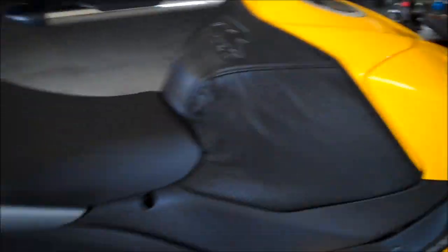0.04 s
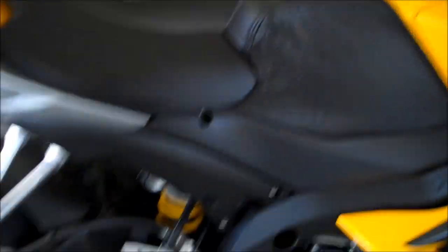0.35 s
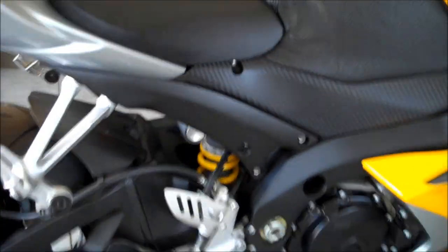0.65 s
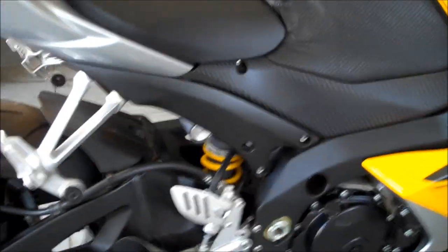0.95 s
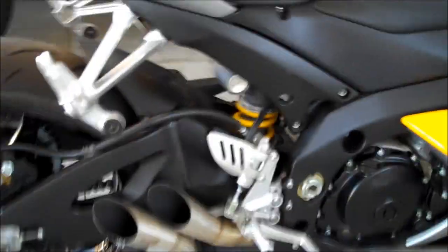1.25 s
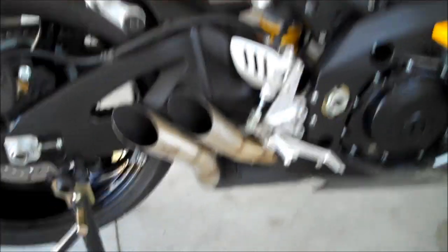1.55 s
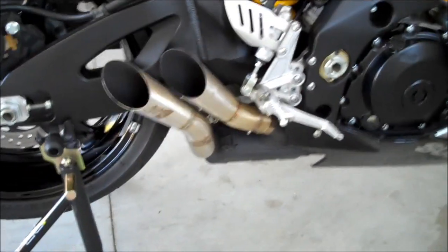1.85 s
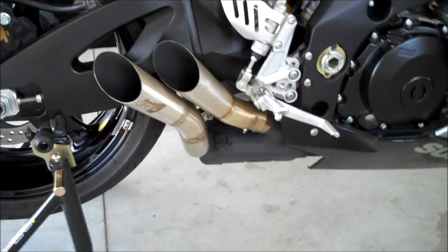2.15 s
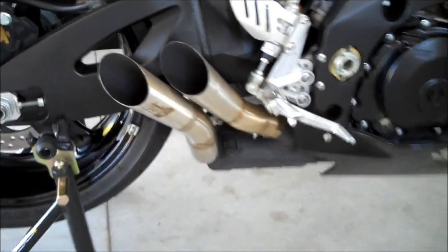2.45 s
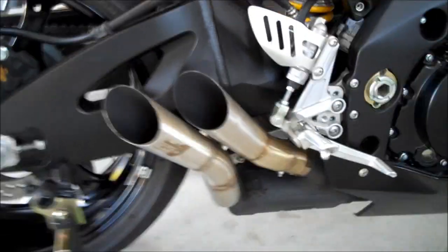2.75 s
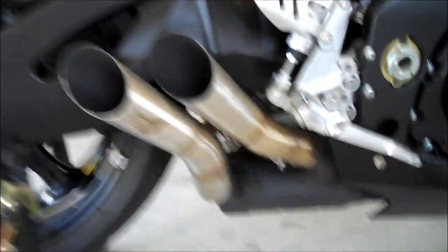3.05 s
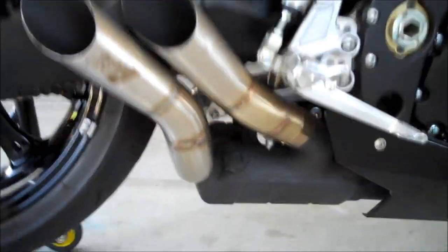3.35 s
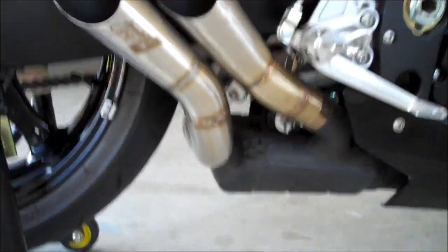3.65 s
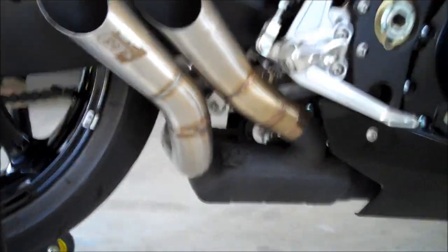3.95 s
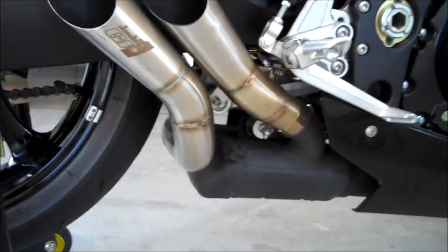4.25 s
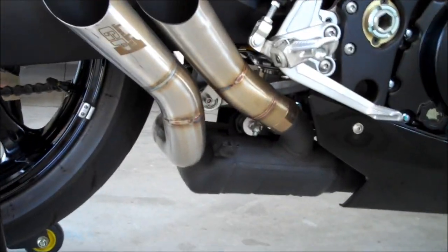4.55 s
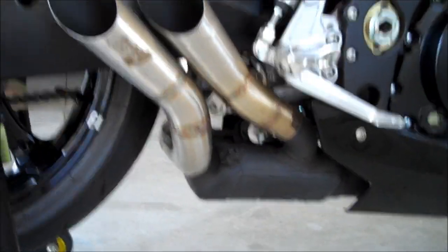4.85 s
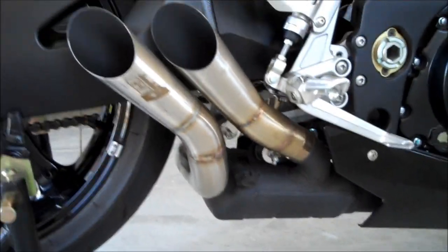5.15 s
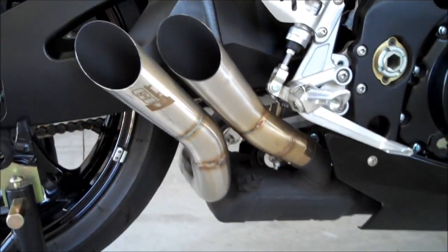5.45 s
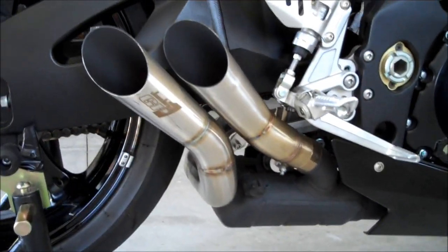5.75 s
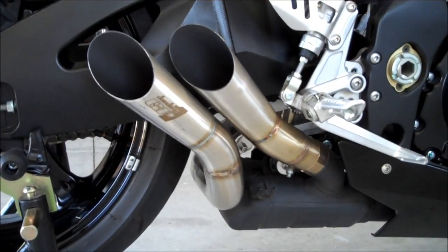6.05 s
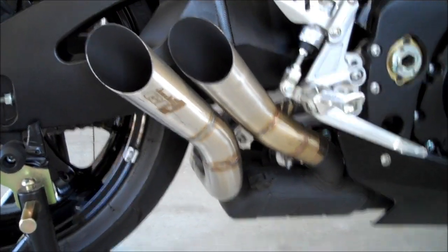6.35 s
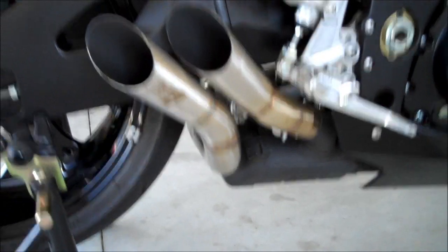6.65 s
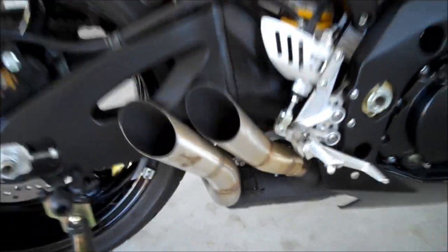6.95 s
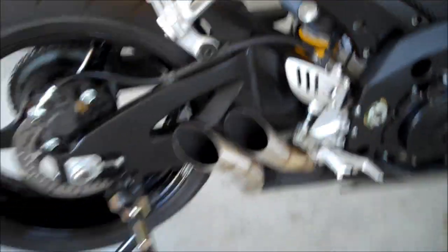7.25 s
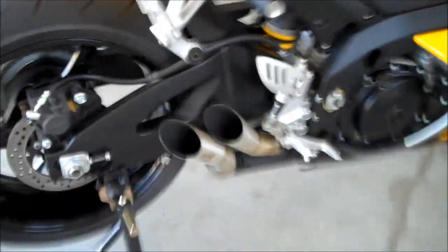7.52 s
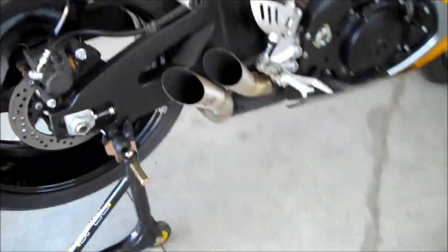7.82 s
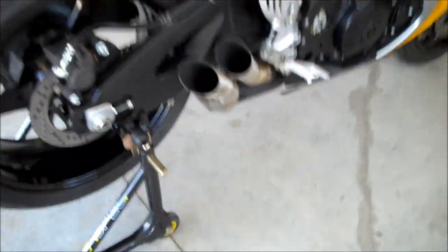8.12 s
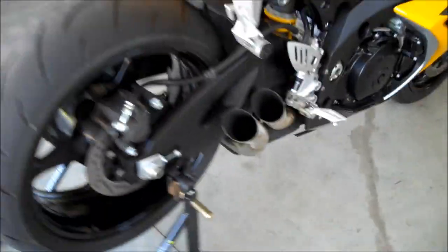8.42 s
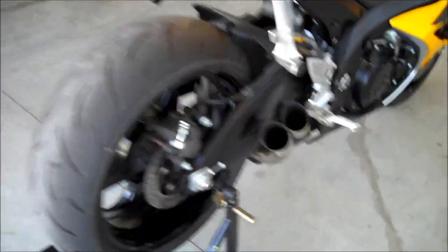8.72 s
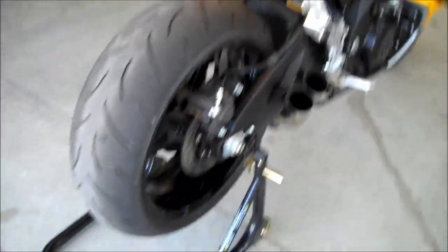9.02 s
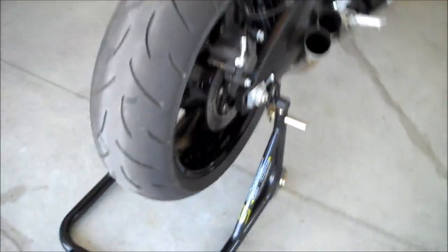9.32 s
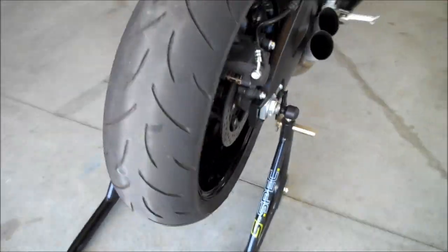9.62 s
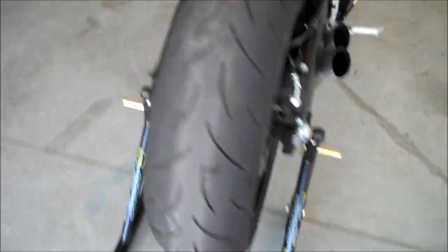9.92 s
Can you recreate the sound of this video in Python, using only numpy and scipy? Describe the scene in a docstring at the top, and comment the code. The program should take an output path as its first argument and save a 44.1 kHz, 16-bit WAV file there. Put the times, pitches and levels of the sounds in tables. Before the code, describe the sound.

Loud motorcycle exhaust pulses from start to finish at a slightly uneven idle, a bassy drone with a raspy, tinny crackle on top. Weak firings make it sag and surge back, and a few pop more sharply. The microphone moves in near the open pipes midway, where the thud deepens, then backs away toward the rear, where the sound turns a little brighter and hollower. The garage adds a short echo.

```python
"""A garage: a four-cylinder sport motorcycle idles at about 1200 rpm through two short open pipes.
Each firing, some forty a second, throws out a sharp crack, a sizzle and a chuff of gas, pings the pipe
walls and sets off a deep boom near 120 Hz with a honk an octave above. The idle hunts and stumbles:
weak firings let the boom sag and drag the crank, the sound surges back, and some firings spit.
The microphone passes close by the pipes and ends up behind the rear wheel."""
import sys
import numpy as np
from scipy import signal
from scipy.fft import rfft, irfft, next_fast_len
from scipy.io import wavfile

SR = 44100
rng = np.random.default_rng(int(sys.argv[2]) if len(sys.argv) > 2 else 0)


def to_wav(s):
    """Save 16-bit WAV."""
    ch = np.atleast_2d(s).T  # columns
    pcm = np.round(np.clip(ch, -1, 1) * 32767)  # PCM
    wavfile.write(sys.argv[1], SR, pcm.astype(np.int16))


N = 440118
TIME = np.arange(N) / SR
PADDED = next_fast_len(N, True)
HZ = np.fft.rfftfreq(PADDED, 1 / SR)

# the hunting idle: (time [s], firing rate [Hz])
FIRING_RATE = [(0.0, 40.04), (0.591, 41.75), (0.927, 40.42), (1.389, 42.62), (1.666, 38.37), (1.997, 41.19),
               (2.439, 38.53), (3.482, 41.94), (3.612, 39.43), (3.8, 43.43), (3.947, 39.46), (5.5, 40.2),
               (5.627, 43.78), (5.807, 38.6), (6.152, 40.32), (6.802, 39.56), (6.945, 41.04), (7.9, 40.12),
               (8.055, 41.84), (8.419, 39.53), (8.549, 41.35), (9.114, 38.72), (9.242, 40.6), (9.98, 39.86)]
# accents of the four cylinders, in firing order: (boom [dB], crack [dB])
CYLINDER_ACCENTS = [(5, 2), (4.1, 2.5), (5.5, 4.2), (4, 3.06)]
# runs of weak firings: (time [s], length [firings], boom sag [dB])
STUMBLES = [(1.095, 1.5, 7), (1.477, 0.85, 10), (1.68, 4, 4.5), (1.88, 1, 9), (2.43, 1.4, 7.5),
            (2.51, 2, 5), (2.79, 0.86, 8), (3.357, 1.5, 13), (5.567, 2.3, 10.5), (6.06, 1, 15.5),
            (7.057, 1.1, 12), (7.549, 2.3, 7.5), (7.846, 2.4, 7.5), (8.045, 0.83, 18.5), (8.093, 2, 5.5),
            (8.436, 2.8, 11), (8.98, 3, 5), (9.08, 5.4, 7.5), (9.557, 2, 14.5)]
# firings that spit: (time [s], crack accent [dB])
SPITS = [(1.239, 7.5), (1.503, 0), (1.577, 5.5), (1.707, 5.5), (1.781, 4), (2.304, 7.5), (2.381, 9),
         (2.561, 8), (2.636, 5.5), (2.839, 5), (2.939, 5.5), (3.406, 1), (6.785, 7.5), (6.886, 6.5),
         (7.351, 7), (7.474, 5), (7.55, 8), (7.603, 8.5), (7.677, 6.5), (7.971, 8.5), (8.068, 3),
         (8.192, 6), (8.564, 7.5), (9.033, 2.5), (9.163, 3)]
# the microphone move: (time [s], distance [0 near, at the pipe mouths .. 1 far])
MIC_DISTANCE = [(0, 0.7), (1, 0.61), (1.6, 0.43), (2.5, 0.31), (3.5, 0.023), (6.3, 0.061), (7.5, 0.6),
                (8.5, 0.78), (10, 0.59)]
# fader rides along that move: (time [s], boom [dB], honk [dB], chuff [dB], crack [dB])
FADERS = [(0, -11, -23, -29.5, -36), (.55, -10, -29.5, -31.5, -34), (.85, -10, -30.5, -28.5, -33.5),
          (1.2, -11, -27.5, -32.5, -34), (1.42, -10, -23.5, -27.5, -31), (2.3, -10, -26, -33, -33),
          (3.3, -11, -26, -33, -35), (4.3, -11.5, -24.5, -34.5, -36.5), (5.4, -11.5, -25.5, -36, -36),
          (6.3, -10.5, -24, -33.5, -35.5), (6.75, -11.5, -25, -34.5, -34.5),
          (7.3, -10.5, -27.5, -33.5, -33.5), (8.1, -11.5, -27, -31.5, -35), (8.7, -11, -22.5, -28.5, -34),
          (9.2, -10, -19.5, -29, -32), (9.4, -10.5, -22, -30, -36), (10, -12, -25, -29, -32.5)]
# broad colour of the escaping gas: (frequency [Hz], level [dB])
GAS_COLOUR = [(150, -31), (300, -2.5), (400, -8), (560, -9.5), (860, -12), (1220, -14), (1700, -7.5),
              (2400, -10), (4000, -8), (5200, -7), (7600, -8.5), (10000, -24.5), (12000, -29.5),
              (14500, -33.5)]
# how centred the gas sounds: (frequency [Hz], left-right correlation [0..1])
GAS_CORRELATION = [(300, 0.9), (620, 0.97), (1360, 0.83), (3000, 0.75), (6500, 0.61), (14000, 0.13)]
# pipe resonances: (frequency [Hz], width [Hz], near boost [dB], far boost [dB])
PIPE_MODES = [(477, 50, 8, 4.5), (665, 157, 9.5, 2.5), (738, 32, -0.5, 12.5), (1017, 27, 0, 9.5),
              (1473, 23, 10, 9.5), (2036, 560, 10, 4.5), (2607, 165, 8, 4.5), (2984, 550, 10, 0.5),
              (3600, 170, 9.5, 2), (4800, 110, -0.5, 0.5), (5590, 780, -0.5, -2.5), (6250, 290, 4.5, 3.5)]
# low-end response of pipes and garage: (frequency [Hz], near level [dB], far level [dB])
BOOM_SPECTRUM = [(20, -32, -21), (39.7, -31, -23), (55.5, -11, -24), (79, -16.5, -21.5),
                 (99.8, -16.5, -11.5), (117.2, -0.5, -2.5), (122, 0, 3.5), (146.4, -11, -3.5),
                 (164, -23.5, -19.5), (206.6, -19, -16.5), (249, -59.5, -23), (397, -73.5, -75.5)]
# the octave above the boom and its overtones: (frequency [Hz], level [dB])
HONK_SPECTRUM = [(120, -38.5), (215, -4.5), (244, 4.5), (262, 0.5), (290, -30), (330, -38), (370, -24),
                 (430, -39.5), (490, -32.5), (620, -34)]
# hollow pipe pop, then metallic wall pings: (frequency [Hz], near level [dB], far level [dB], decay [s])
PING_MODES = [(679, -2, -17, 0.0061), (2084, -5, -26.5, 0.0071), (2941, -5, -18.5, 0.0061),
              (3302, -7.5, -19, 0.004), (4600, -35, -2.5, 0.0032), (5594, -7, -11, 0.0056),
              (6457, -10, -6.5, 0.0056), (6960, -52, -28, 0.0027)]
# brief ducks of the whole mix: (time [s], depth [dB], hold until [s after], recovery [s])
DUCKS = [(2.694, 4.5, 0.02, 0.11), (2.969, 7, 0.035, 0.12), (3.657, 12, 0.073, 0.21),
         (4.684, 6, 0.024, 0.094), (5.764, 10.5, 0.082, 0.19), (7.989, 7, 0.062, 0.099),
         (9.465, 8, 0.036, 0.29)]
# tone of the microphone pair: (frequency [Hz], left minus right [dB])
MIC_BALANCE = [(120, -1), (320, -.5), (750, -1.3), (2000, -1), (4000, -1), (6000, -1.6), (7400, 3),
               (9250, 9), (14000, 11.5)]
# bass corners of the pair: (left [Hz], right [Hz])
MIC_CORNERS = [75, 40]

DRAG_S, DRAG_PEAK_S = .0015, .07  # crank lag from one lost firing, and when it peaks
SURGE_DB, SURGE_PEAK_S = [1.5, 2.1, 3, 3], .046  # lift of the four faders per lost firing, and its delay
BOOM_SCATTER_DB, CRACK_SCATTER_DB, JITTER_S = .46, 1.82, .00039  # no two firings are quite alike
WEAK_CRACK_DB = 2.5  # a lost firing cracks this much less
BEFORE_SPIT_DB = -3.5  # the firing before a spit burns poorly and leaves fuel in the pipe
OUTFLOW_DELAY_S = .001  # the bulk of the gas leaves just after the crack


def gain_of(db):
    """Decibels to amplitude."""
    return 10 ** (np.asarray(db) / 20)


def unit_rms(x):
    """Scales to rms 1."""
    return x / np.sqrt(np.mean(x ** 2) + 1e-20)


def spectrum_at(points, hz):
    """Reads a spectrum on a logarithmic frequency axis."""
    f, value = np.transpose(points)
    return np.interp(np.log(hz + 1), np.log(f + 1), value)


def automation(rows):
    """Each column of a timed table as a curve at every sample."""
    times, *columns = np.transpose(rows)
    return [np.interp(TIME, times, column) for column in columns]


def mic_blend(near, far):
    """Crossfades from near to far as the microphone moves."""
    distance = automation(MIC_DISTANCE)[0]
    return (1 - distance) * near + distance * far


def clicks(times, sizes):
    """A train of single-sample impulses."""
    at = np.clip(np.round(times * SR).astype(int), 0, N - 1)
    return np.bincount(at, sizes, N)


def aftermath(times, lost, peak_s):
    """At every firing, the rising and fading effect of the firings lost before it."""
    age = np.maximum(times[:, None] - times, 0) / peak_s
    return (age * np.exp(1 - age)) @ lost


def firings():
    """The engine's rhythm: time and accent of each push and crack, and the surge after stumbles."""
    count = .17 + np.cumsum(automation(FIRING_RATE)[0]) / SR
    times = TIME[1:][np.diff(np.floor(count)) > 0]
    number, sag_db = np.arange(len(times)), np.zeros(len(times))
    for start, length, drop_db in STUMBLES:
        since = number - np.argmin(abs(times - start))
        sag_db += drop_db * (since >= 0) * np.clip(length - since, 0, 1)
    lost = 1 - gain_of(-sag_db)
    times = times + DRAG_S * aftermath(times, lost, DRAG_PEAK_S)
    accents = np.array(CYLINDER_ACCENTS)[number % len(CYLINDER_ACCENTS)]
    push, snap, jitter = rng.standard_normal((len(times), 3)).T
    push_db = accents[:, 0] + BOOM_SCATTER_DB * push - sag_db
    crack_db = accents[:, 1] + CRACK_SCATTER_DB * snap - WEAK_CRACK_DB * lost
    crack_times = times.copy()
    for spit_time, spit_db in SPITS:
        k = np.argmin(abs(times - spit_time))
        crack_times[k], crack_db[k] = spit_time, spit_db
        crack_db[k - 1] = BEFORE_SPIT_DB
    surge = np.interp(TIME, times, aftermath(times, lost, SURGE_PEAK_S))
    return times + JITTER_S * jitter, push_db, crack_times, crack_db, surge


def bursts(times, accent_db, rise_s, decay_s, slap, slap_s, tail, tail_s, scatter_db):
    """Envelope of the turbulence: a burst per firing, a slap off the walls and the garage's short tail."""
    t = np.arange(SR // 5) / SR
    attack = 1 - np.exp(-(t / rise_s) ** 2)
    direct = attack * np.exp(-t / decay_s)
    echo = np.interp(t - slap_s, t, direct, left=0)
    burst = direct + slap * echo + tail * attack * np.exp(-t / tail_s)
    energy = gain_of(accent_db + scatter_db * rng.standard_normal(len(times))) ** 2
    power = signal.oaconvolve(clicks(times, energy), burst)[:N]
    return unit_rms(np.sqrt(np.maximum(power, 0)))


def gas(envelope, low_hz, high_hz):
    """One stereo band of gated turbulence, coloured by the pipes as heard from the microphone."""
    left, other = rfft(rng.standard_normal((2, N)) * envelope, PADDED)
    shared = spectrum_at(GAS_CORRELATION, HZ)
    right = shared * left + np.sqrt(1 - shared ** 2) * other
    band = 1 / np.sqrt((1 + (low_hz / (HZ + 1)) ** 16) * (1 + (HZ / high_hz) ** 16))
    pair = np.array([left, right]) * band * gain_of(spectrum_at(GAS_COLOUR, HZ))
    hz, width, *boosts_db = np.transpose(PIPE_MODES)
    peaks = 1 / (1 + ((HZ[:, None] - hz) / width) ** 2) ** 3
    near, far = (unit_rms(irfft(pair * gain_of(peaks @ db), PADDED)[:, :N]) for db in boosts_db)
    return mic_blend(near, far)


def crack(times, accent_db):
    """The attack: a hard upper-mid snap of gas at each firing."""
    snap = bursts(times + .0005, accent_db, rise_s=.00077, decay_s=.00068,
                  slap=.044, slap_s=.043, tail=.17, tail_s=.022, scatter_db=1.9)
    return gas(snap, low_hz=1170, high_hz=4020)


def sizzle(times, accent_db):
    """The top end: a softer-edged spray of gas hiss on each crack."""
    spray = bursts(times + .0006, accent_db, rise_s=.002, decay_s=.002,
                   slap=.39, slap_s=.0078, tail=.087, tail_s=.031, scatter_db=1.5)
    return gas(spray, low_hz=4230, high_hz=18000)


def pressure_pulses(times, accent_db, turbulence):
    """One pulse per firing over churning gas; the steady outflow makes no sound."""
    pulses = unit_rms(clicks(times + OUTFLOW_DELAY_S, gain_of(accent_db)))
    return pulses - pulses.mean() + turbulence * rng.standard_normal(N)


def resonate(drive, points, size=16384, preroll_s=.1985):
    """Rings a minimum-phase resonance of the given spectrum; a pre-roll has it sounding from the start."""
    hz = np.fft.rfftfreq(size, 1 / SR)
    rolloff_db = 40 * np.log10(np.maximum(hz / points[-1][0], 1))
    db = spectrum_at(points, hz) - rolloff_db
    log_gain = np.log(gain_of(np.r_[db, db[-2:0:-1]]))
    response = np.exp(np.conj(signal.hilbert(log_gain)))[:len(hz)]
    ring = irfft(response)[:size // 2]
    lead = round(preroll_s * SR)
    return unit_rms(signal.oaconvolve(np.r_[drive[:lead], drive], ring)[lead:lead + N])


def waver(depth_db, top_hz=6.0, count=24):
    """A gain that wanders slowly at random, by depth_db rms."""
    coarse = TIME[::441]
    hz, phase = np.geomspace(top_hz / 4, top_hz, count), rng.random(count)
    wander = np.sin(2 * np.pi * (np.outer(coarse, hz) + phase)).sum(1)
    return gain_of(depth_db * np.interp(TIME, coarse, unit_rms(wander)))


def boom(times, push_db):
    """The weight: pipes and garage ring three cycles per firing, with more thud underneath up close."""
    drive = pressure_pulses(times, push_db, turbulence=.19)
    hz, near_db, far_db = np.transpose(BOOM_SPECTRUM)
    near, far = (resonate(drive, np.c_[hz, db]) for db in (near_db, far_db))
    return -waver(depth_db=.45) * mic_blend(near, far)


def honk(times, push_db):
    """The body: the pulses ring an octave above the boom, sagging less and wavering more."""
    drive = pressure_pulses(times, .4 * push_db, turbulence=.2)
    return waver(depth_db=1.54) * resonate(drive, HONK_SPECTRUM)


def pings(times, accent_db, scatter_db=2.2, detune=.033, rise_s=.00051, pan_db=5.0):
    """The metal: each firing rings the pipes briefly, every mode with random strength, pitch and pan."""
    t = np.arange(SR // 50) / SR
    at = np.round((times + .0015) * SR).astype(int)[:, None] + np.arange(len(t))
    out = np.zeros((2, N))
    for hz, near_db, far_db, decay_s in PING_MODES:
        size, pitch, phase, side = rng.standard_normal((len(times), 4)).T[:, :, None]
        envelope = (1 - np.exp(-(t / rise_s) ** 2)) * np.exp(-t / decay_s)
        tones = np.sin(2 * np.pi * (hz * (1 + detune * pitch) * t + phase)) * envelope
        tones *= gain_of(accent_db[:, None] + scatter_db * np.clip(size, -2, 1))
        stray_db = pan_db * side * min(hz / 4000, 1)  # lower modes stay nearer the centre
        pair = [np.bincount(at.ravel(), (tones * gain_of(db)).ravel(), N)[:N]
                for db in (stray_db, -stray_db)]
        out += gain_of(mic_blend(near_db, far_db)) * unit_rms(np.array(pair))
    return out


def chuff(times, accent_db):
    """The breath: a round midrange puff of gas trailing each crack."""
    puff = bursts(times + .0047, .4 * accent_db, rise_s=.0034, decay_s=.0036,
                  slap=.21, slap_s=.0087, tail=.11, tail_s=.053, scatter_db=1.67)
    return gas(puff, low_hz=312, high_hz=1310)


def ducking(fall_s=.0027):
    """A gain that drops abruptly and swells back at each duck."""
    cut_db = sum(np.interp(TIME, start + np.array([0, fall_s, hold, hold + recovery]), [0, db, db, 0])
                 for start, db, hold, recovery in DUCKS)
    return gain_of(-cut_db)


def scene():
    """Mixes the six exhaust layers, all triggered by the same firings."""
    push_times, push_db, times, accent_db, surge = firings()
    boom_db, honk_db, chuff_db, crack_db = automation(FADERS) + np.outer(SURGE_DB, surge)
    bright_db = crack_db + mic_blend(near=-.5, far=3.5)
    mix = (gain_of(boom_db) * boom(push_times, push_db)
           + gain_of(honk_db) * honk(times, push_db)
           + gain_of(chuff_db - 3.2) * chuff(times, accent_db)
           + gain_of(crack_db - 1.4) * crack(times, accent_db)
           + gain_of(bright_db - 2.54) * sizzle(times, accent_db)
           + gain_of(bright_db) * pings(times, accent_db))
    return mix * ducking()


def record(dry, knee=.75, cutoff_hz=14500):
    """The left microphone is thinner and brighter than the right; then a soft clip and a high cut."""
    tilt_db = spectrum_at(MIC_BALANCE, HZ) / 2
    pair = gain_of([tilt_db, -tilt_db]) / (1j * HZ + np.array(MIC_CORNERS)[:, None])
    heard = irfft(rfft(dry, PADDED) * pair / pair.mean(0), PADDED)[:, :N]
    linear = np.clip(heard, -knee, knee)
    rounded = linear + (1 - knee) * np.tanh((heard - linear) / (1 - knee))
    high_cut = signal.firwin(511, cutoff_hz, window=("kaiser", 9), fs=SR)
    return signal.oaconvolve(rounded, high_cut[None], "same")


dry = scene()
out = record(dry)
to_wav(out)
```